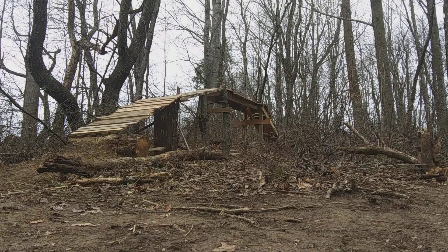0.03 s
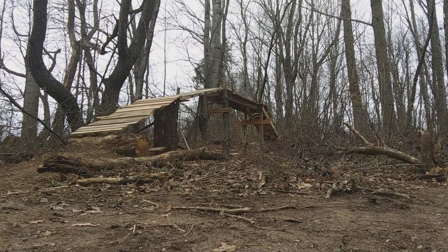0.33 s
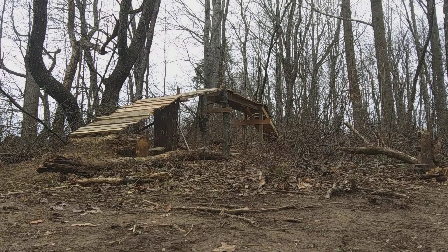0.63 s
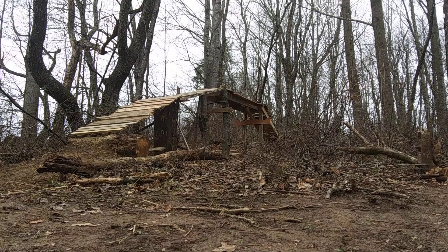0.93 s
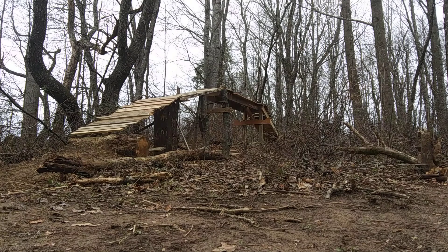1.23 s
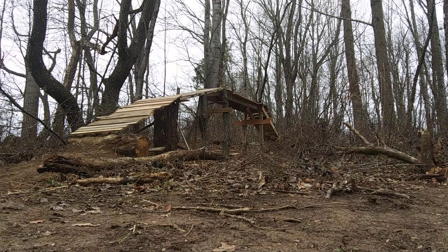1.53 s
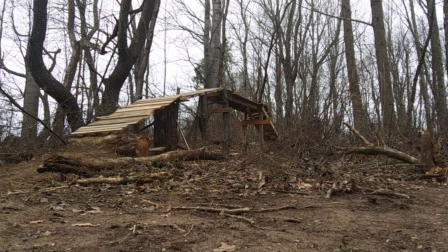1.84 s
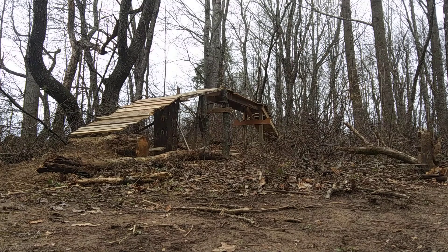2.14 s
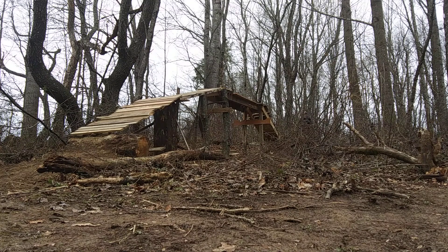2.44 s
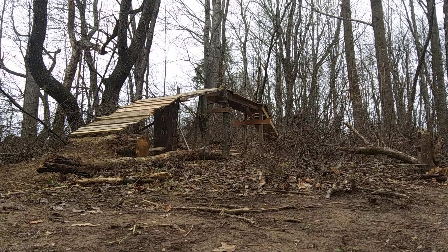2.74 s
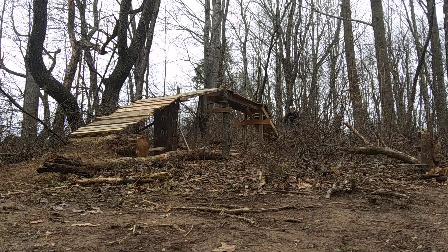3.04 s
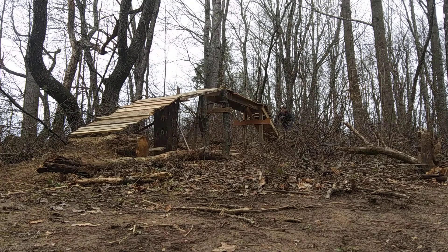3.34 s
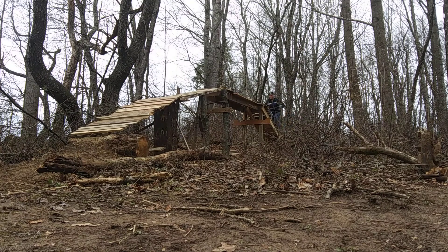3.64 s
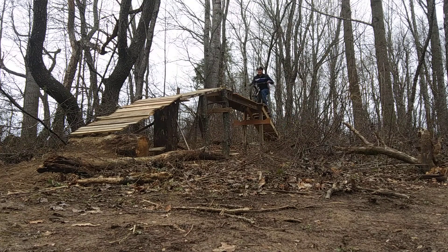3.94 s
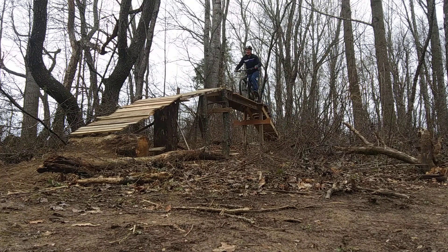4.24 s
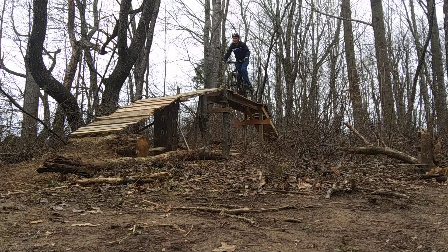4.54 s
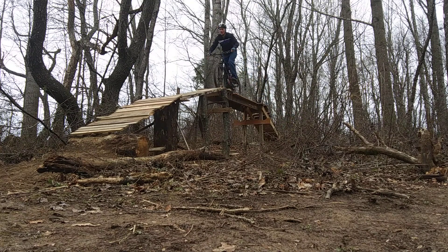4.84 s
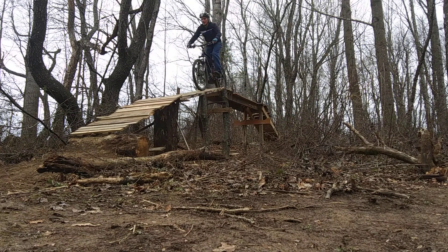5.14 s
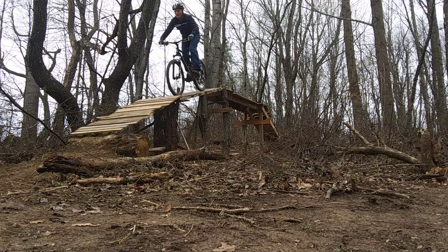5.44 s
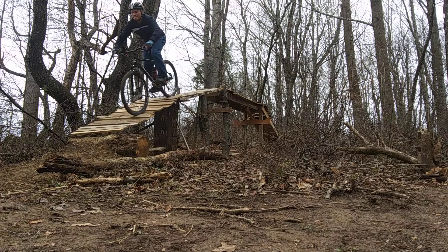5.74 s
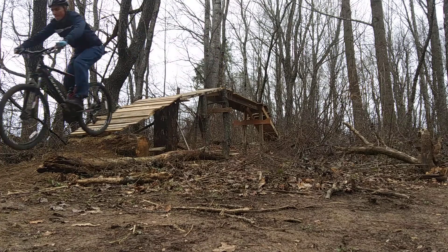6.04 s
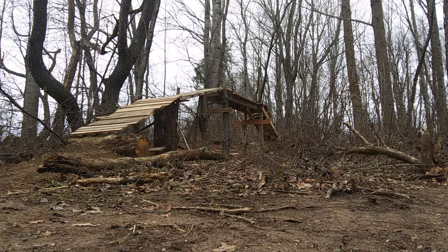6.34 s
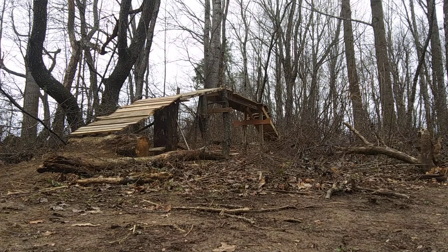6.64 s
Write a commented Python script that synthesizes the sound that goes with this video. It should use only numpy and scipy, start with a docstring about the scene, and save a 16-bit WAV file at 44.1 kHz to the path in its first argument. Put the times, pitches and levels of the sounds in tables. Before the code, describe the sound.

A mountain bike approaches through a still forest where a small bird is barely heard far off. Its tyres bump onto a hollow wooden ramp, the boards snapping and humming lightly beneath them. After a softer stretch of coasting, the wheels slam down on the near slope, loud and close. The chain clatters against the frame as the bike passes the microphone and runs out over gritty ground and dry leaves.

```python
"""A quiet, leafless wood with a far-off bird. A mountain bike crosses a wooden ramp and passes close by.
Its wheels knock onto the far slope and rumble over the slats, setting the planks ringing; after a short
hop it slams onto the near slope. The chain slaps the frame, then rattles lightly as the tyres crunch
out over dirt and dry leaves. The trunks scatter a faint tail."""
import sys
import numpy as np
from scipy import signal
from scipy.fft import rfft, irfft
from scipy.io import wavfile
from scipy.ndimage import uniform_filter1d

SR = 44100
rng = np.random.default_rng(int(sys.argv[2]) if len(sys.argv) > 2 else 0)


def waveform_to_disk(signal):
    """Save audio, clipped to [-1, 1], as 16-bit WAV at the path in sys.argv[1]."""
    frames = np.transpose(np.atleast_2d(signal))
    scaled = np.clip(frames, -1, 1) * 32767
    samples = np.round(scaled).astype(np.int16)
    wavfile.write(sys.argv[1], SR, samples)


N = 295029
T = np.arange(N) / SR
CUTOFF_HZ = 16000


def from_db(db):
    """Decibels to gain."""
    return 10 ** (np.asarray(db) / 20)


def rms_one(x):
    """Scale to rms 1."""
    return x / np.sqrt(np.mean(x ** 2) + 1e-20)


def at_hz(points, hz):
    """Read a curve along log frequency."""
    f, value = np.transpose(points)
    return np.interp(np.log(np.maximum(hz, 1)), np.log(f), value)


def eq(x, curve, size=4096):
    """Minimum-phase EQ: nothing rings ahead of an attack."""
    gain = from_db(at_hz(curve, np.fft.rfftfreq(size, 1 / SR)))
    cepstrum = irfft(np.log(gain))
    cepstrum[1:size // 2] *= 2
    cepstrum[size // 2 + 1:] = 0
    impulse = irfft(np.exp(rfft(cepstrum)))[:size // 2]
    return signal.fftconvolve(x, impulse)[:len(x)]


def butter(x, hz, kind):
    """A gentle low-, high- or band-pass."""
    return signal.sosfilt(signal.butter(2, hz, kind, fs=SR, output="sos"), x)


def resonate(x, hz, width_hz):
    """One resonance, unity gain at its peak."""
    r = np.exp(-np.pi * width_hz / SR)
    feedback = [1, -2 * r * np.cos(2 * np.pi * hz / SR), r * r]
    return signal.lfilter(np.array([1, 0, -1]) * (1 - r * r) / 2, feedback, x + 1e-18)


def drift(per_s):
    """A smooth, bounded random modulator; rms 1."""
    knots = rng.standard_normal(4096)
    wander = np.interp(T * per_s, np.arange(len(knots)), knots)
    return rms_one(np.clip(rms_one(wander), -2, 2))


def grains(per_s, spread_db):
    """Random clicks of uneven size; rms 1."""
    sizes = from_db(spread_db * np.minimum(rng.exponential(1, N), 4))
    return rms_one(sizes * rng.choice([-1, 1], N) * (rng.random(N) < per_s / SR))


def burst(t60, rise_s, smooth_bins=201, snap_db=0.0, snap_s=0.00074, size=16384):
    """A contact: a snap, then a dying flurry of micro-impacts, flattened to drive all bands alike."""
    t = np.arange(size) / SR
    attack = 1 - np.exp(-t / rise_s)
    decay = from_db(-60 * t / t60) + from_db(snap_db) * np.exp(-t / snap_s)
    spectrum = rfft(rng.standard_normal(size) * attack * decay)
    power = uniform_filter1d(abs(spectrum) ** 2, smooth_bins)
    return irfft(spectrum / np.sqrt(power + 1e-12))[:size // 2]


def ping(x, hz, width_hz=170, spread=0.506, count=7):
    """A small part rung by x: one mode at hz, inharmonic ones scattered around it; rms 1."""
    steps = np.linspace(-1, 1, count) + rng.uniform(-0.93, 1, count) / count
    partials = np.minimum(hz * np.exp(spread * steps), CUTOFF_HZ)
    others = sum(rng.choice([-1, 1]) * rms_one(resonate(x, f, width_hz)) for f in partials)
    return rms_one(rms_one(resonate(x, hz, width_hz)) + others)


def add(out, s, db, sound):
    """Spot a sound at time s, its loudest 4 ms at an rms level of db."""
    start = round(s * SR)
    loudest = np.sqrt(uniform_filter1d(sound ** 2, 176).max())
    out[start:start + len(sound)] += (from_db(db) / loudest * sound)[:N - start]


# Tone of the ambience bed: f/Hz, level/dB
AIR_EQ = [(24, -47), (40, -13), (77, -32), (96, -21), (296, -6), (500, -1), (1010, -1.16), (1470, -7),
          (3700, -12), (15800, -20.5)]

def air(level_db=-67):
    """The steady, distant hush of the wood."""
    return from_db(level_db) * rms_one(eq(rng.standard_normal(N), AIR_EQ))


# Reverb time of the wood: f/Hz, t60/s
WOOD_DECAY = [(200, 0.66), (1500, 0.83), (6000, 0.53), (14000, 0.11)]

def trunks(x, wet_db=-9.0, build_s=0.00043, bands=8):
    """Diffuse scatter from ramp and trees; the treble dies first."""
    t = T[:SR]
    edges, tail = np.geomspace(100, 16000, bands + 1), 0
    for low, high in zip(edges, edges[1:]):
        band = butter(rng.standard_normal(SR), [low, high], "band")
        t60 = at_hz(WOOD_DECAY, np.sqrt(low * high))
        tail = tail + band * from_db(-60 * t / t60)
    tail *= 1 - np.exp(-t / build_s)
    return from_db(wet_db) * signal.fftconvolve(x, tail / np.linalg.norm(tail))[:N]


# The bike's approach: t/s, distance/m
BIKE_PATH = [(3.5, 4), (5.77, 1.32), (6.25, 0.86), (6.69, 1)]

def reverb_send():
    """The sound dries up as the bike comes nearer, down to one metre."""
    metres = np.maximum(np.interp(T, *np.transpose(BIKE_PATH)), 1)
    return np.sqrt(metres / metres[0])


# Bird notes: t/s, length/s, f/Hz, level/dB
BIRD_NOTES = [(0.412, 0.11, 5050, -81), (1.777, 0.022, 5740, -72), (1.97, 0.025, 6250, -75)]

def bird(fall=0.043, waver=0.02):
    """A small bird far off: thin, wavering notes that slide down a little."""
    out = np.zeros(N)
    for s, length, hz, db in BIRD_NOTES:
        progress = np.linspace(0, 1, int(length * SR))
        bend = fall * (0.5 - progress) + waver * drift(per_s=300)[:len(progress)]
        phase = 2 * np.pi * np.cumsum(hz * (1 + bend)) / SR
        add(out, s, db, np.sin(phase) * np.sin(np.pi * progress))
    return out


# Bright tone shared by trail ticks and chain: f/Hz, level/dB
CLICK_EQ = [(150, -51), (700, 3), (2000, -4), (6800, -1), (9300, -7), (12000, -9), (16000, -16)]

def click_tone(x, hz, fall_db):
    """Voice a hard click: a hump at hz, falling fall_db per octave to either side."""
    octaves = np.arange(-5, 4)
    hump = np.transpose([hz * 2.0 ** octaves, -fall_db * abs(octaves)])
    return eq(eq(x, hump), CLICK_EQ)


# Small ticks as the bike approaches: t/s, level/dB before trim
TRAIL_TICKS = [(1.231, -54), (2.3035, -58), (2.3565, -51.5), (2.803, -60), (2.975, -56), (3.3523, -55),
               (3.4032, -56), (4.13, -54), (4.33, -55), (5.126, -50.5), (5.584, -48)]

def trail_ticks(trim_db=-5.5):
    """Thin, faint snaps: a few far off before the bike arrives, more as it crosses the ramp."""
    out = np.zeros(N)
    for s, db in TRAIL_TICKS:
        snap = burst(t60=0.012, rise_s=0.0004)
        add(out, s, db + trim_db, click_tone(snap, hz=5830, fall_db=16.0))
    return out


# Crisp tone shared by grit and drivetrain: f/Hz, level/dB
CRISP_EQ = [(500, -25), (1800, -4), (3200, -6), (5700, 10), (8000, -7), (11000, -7), (16000, -24)]

def crisp(x):
    """Thin clicks down to a dry, papery top end; rms 1."""
    return rms_one(eq(x, CRISP_EQ))


# Light ticking while coasting: t/s, rate/Hz, level/dB before trim
COAST_TICKS = [(4.25, 27, -59), (4.599, 23, -63), (5.02, 40, -72), (5.75, 39, -59)]

def drivetrain(trim_db=-5.5, uneven_db=3.0):
    """The coasting drivetrain ticks in step with the wheel's speed."""
    s, per_s, db = np.transpose(COAST_TICKS)
    tick_count = np.cumsum(np.interp(T, s, per_s, left=0, right=0)) / SR
    out = np.zeros(N)
    for at in T[1:][np.diff(np.floor(tick_count)) > 0]:
        snap = crisp(burst(t60=0.025, rise_s=0.00051))
        tick = snap + ping(snap, hz=4230)
        tick_db = np.interp(at, s, db) + uneven_db * rng.standard_normal()
        add(out, at, tick_db + trim_db, tick)
    return out


# Hum of the tread on the boards: t/s, f/Hz, level/dB before flutter, octave/dB re fundamental
TREAD_HUM = [(3.53, 420, -73, -11), (3.59, 490, -59.5, -2), (3.66, 500, -64, 8), (3.73, 590, -66.5, -5),
             (3.81, 430, -66, -16), (3.95, 353, -64.5, -7), (4.049, 250, -76, -2), (4.5, 266, -80, 4),
             (5.099, 290, -68, 1), (5.698, 280, -70, 8)]

def tread_hum(flutter_db=4.5, climb_waver_hz=21, deck_waver_hz=50, deck_start_s=4.05):
    """Knobs meet the boards in a nearly regular stream, which blurs to a rumble on the uneven deck."""
    s, hz, db, octave_db = np.transpose(TREAD_HUM)
    waver_hz = np.where(T < deck_start_s, climb_waver_hz, deck_waver_hz)
    knob_hz = np.interp(T, s, hz) + waver_hz * drift(per_s=150)
    phase = 2 * np.pi * np.cumsum(knob_hz) / SR
    octave = from_db(np.interp(T, s, octave_db))
    tone = rms_one((np.sin(phase) + octave * np.sin(2 * phase)) / np.hypot(1, octave))
    fader_db = np.interp(T, s, db, left=-120, right=-120)
    return tone * from_db(fader_db + flutter_db * (drift(per_s=60) - 0.5))


# Resonances of the ramp's planks: f/Hz, width/Hz, level/dB relative to ring_db
PLANK_RING = [(344, 59, -6), (450, 140, -4), (562, 37, -2.5), (760, 56, -8.5), (1010, 76, 3.5),
              (1154, 34, -10.5), (1495, 37, 1.5), (1650, 56, 2), (1830, 38, -1), (2130, 110, 5),
              (2580, 45, 4), (2980, 430, 4)]

def planks(x, ring_db):
    """The contact itself plus the woody ring it sets off."""
    return x + sum(from_db(ring_db + db) * resonate(x, hz, width) for hz, width, db in PLANK_RING)


def clinks(level_db=-9.0, per_s=12, low_hz=2700, high_hz=9500, count=12):
    """Loose parts and leaves click at random, each at its own pitch; each of the count pitches clicks about
    per_s times a second."""
    out = np.zeros(N)
    for hz in np.geomspace(low_hz, high_hz, count):
        hits = signal.fftconvolve(grains(per_s, spread_db=3.5), burst(t60=0.05, rise_s=0.00036))
        out += resonate(hits[:N], hz, width_hz=0.053 * hz)
    return from_db(level_db) * rms_one(out)


# Ground under the tyres, in order: trail, far slope, deck, crest, near slope, foot of the ramp, dirt and
# leaves. t/s, length/s, starting rumble/dB, starting crunch/dB, swell/(dB/s)
GROUND = [(2.6, 0.94, -92, -79.5, 8), (3.532, 0.69, -65.5, -65, -5), (4.272, 1.385, -74, -81.5, 7.5),
          (5.709, 0.06, -56, -58, -5), (5.763, 0.32, -43, -44, -3), (6.179, 0.13, -42, -39, -5),
          (6.3, 0.57, -49.5, -48.5, -3)]

def tyre_load(attack_s=0.01, release_db_per_s=175):
    """Envelopes of rumble and crunch: on each stretch the tyres bite, swell or fade, then let go."""
    rumble, crunch = 0, 0
    for s, length, rumble_db, crunch_db, swell_db_per_s in GROUND:
        held = np.clip(T - s, 0, length)
        after = np.maximum(T - s - length, 0)
        shape = np.minimum(held / attack_s, 1) * from_db(swell_db_per_s * held - release_db_per_s * after)
        rumble = np.maximum(rumble, from_db(rumble_db) * shape)
        crunch = np.maximum(crunch, from_db(crunch_db) * shape)
    return rumble, crunch


# Tone of the tyre rumble: f/Hz, level/dB
TYRE_EQ = [(30, -45), (90, -35), (175, -15.5), (305, 0), (500, -1), (1100, -3), (2000, -8.5), (4000, -11.5),
           (12000, -23.5)]

def rolling(grit_db=-9.5, bump_db=3.0, rattle_db=8.0, ramp_end_s=6.33, dirt_low_cut_hz=340):
    """Tread knobs drum, hollow on wood and thin on dirt; grit and leaves crackle with each bump."""
    rumble, crunch = tyre_load()
    bumps = drift(per_s=110)
    knobs = rms_one(eq(grains(per_s=3000, spread_db=2.5), TYRE_EQ))
    on_wood = rms_one(planks(knobs, ring_db=-8.0))
    on_dirt = rms_one(butter(knobs, dirt_low_cut_hz, "high"))
    tread = np.where(T < ramp_end_s, on_wood, on_dirt) * from_db(bump_db * bumps)
    grit = crisp(grains(per_s=650, spread_db=3.5))
    rattle = (bumps + drift(per_s=300)) / 2
    grit *= from_db(grit_db + rattle_db * rattle)
    return rumble * tread + crunch * (grit + clinks())


# Each wheel's weight landing on the ramp's frame: t/s, level/dB
RAMP_THUMPS = [(3.548, -54), (3.736, -53.5)]
# Their hollow low end: f/Hz, level/dB
THUMP_EQ = [(35, -30), (90, -25), (150, -9), (220, 1.5), (450, 3), (900, -32), (3000, -51)]

def ramp_thumps():
    """The hollow ramp booms as the front and then the rear wheel mount it."""
    out = np.zeros(N)
    for s, db in RAMP_THUMPS:
        add(out, s, db, eq(burst(t60=0.19, rise_s=0.0013), THUMP_EQ))
    return out


# Loose boards snapping under the weight: t/s, level/dB before trim
BOARD_SNAPS = [(3.5798, -50), (3.749, -45.5), (3.825, -53), (3.9942, -51), (4.004, -46), (4.028, -52),
               (4.189, -51), (4.222, -54), (4.2337, -53.5)]
# Their hard upper mids: f/Hz, level/dB
SNAP_EQ = [(200, -17), (700, -13), (1900, 1), (4800, -1.5), (7000, -15), (14000, -38)]

def board_snaps(trim_db=-1.5):
    """A board snaps against its support: one spike, a short flurry and the ring of the planks."""
    out = np.zeros(N)
    for s, db in BOARD_SNAPS:
        flurry = burst(t60=0.052, rise_s=0.00032)
        force = signal.unit_impulse(len(flurry)) + flurry / np.linalg.norm(flurry)
        add(out, s, db + trim_db, planks(eq(force, SNAP_EQ), ring_db=-13.0))
    return out


# Light metallic clinks of the chain on the run-out: t/s, level/dB, f/Hz, t60/s
CHAIN_RATTLE = [(6.144, -39.5, 6400, 0.024), (6.395, -33.5, 9100, 0.024), (6.407, -38.5, 6700, 0.047),
                (6.4356, -35.5, 6400, 0.054), (6.481, -30.5, 5750, 0.024), (6.5048, -31, 6100, 0.033),
                (6.511, -30, 5700, 0.024), (6.536, -34.5, 5100, 0.065), (6.555, -37, 5260, 0.031),
                (6.572, -39, 6030, .025), (6.615, -38.5, 8000, .028), (6.648, -35.5, 5700, 0.047),
                (6.659, -36, 5950, .04)]

def chain_rattle(ring_db=-10.0):
    """The chain rattles as the bike rolls out, each clink with a brief ring of its own."""
    out = np.zeros(N)
    for s, db, hz, t60 in CHAIN_RATTLE:
        clink = burst(t60, rise_s=0.00025)
        clink = rms_one(clink) + from_db(ring_db) * ping(clink, hz)
        add(out, s, db, click_tone(clink, hz, fall_db=9.0))
    return out


# Metal hits on the frame: chain slaps, a ringing frame part and the frame bottoming out: t/s, level/dB, f/Hz,
# roll-off/(dB/octave), t60/s
FRAME_HITS = [(3.552, -52, 2440, 9, .03), (3.755, -48, 5870, 13, 0.055), (3.887, -49.5, 4263, 0, 0.16),
              (3.973, -59, 5860, 25, 0.1), (4.201, -59, 4900, 0, 0.082), (5.354, -46.5, 3050, 5, 0.022),
              (5.49, -53, 6500, 4, 0.037), (5.7692, -20, 6520, 33, 0.026), (5.7691, -21.5, 2430, 7, 0.086),
              (5.8088, -29, 2800, 14, 0.013), (5.818, -24.5, 3910, 15, 0.017),
              (5.829, -34.5, 3600, 11, 0.021), (5.868, -36.5, 5250, 26, 0.017),
              (5.898, -38.5, 5520, 15, 0.026), (5.9264, -28.5, 5670, 5.5, 0.062),
              (5.967, -33.5, 5370, 14, 0.021), (5.984, -37.5, 8300, 19, 0.032),
              (6.019, -36, 6600, 0, 0.028), (6.0276, -26.5, 5270, 14, 0.014),
              (6.0361, -23, 4520, 13, 0.012), (6.061, -38.5, 6300, 12, 0.034),
              (6.085, -32.5, 7700, 2, 0.062), (6.192, -31, 5430, 4.5, 0.051),
              (6.2008, -23.5, 6000, 13, 0.022), (6.206, -24.5, 5430, 8, 0.025),
              (6.2104, -27.5, 5300, 1.5, 0.049), (6.2258, -26.5, 5200, 8, 0.037),
              (6.2348, -27.5, 5700, 12, 0.022), (6.245, -27, 3970, 23, 0.047),
              (6.256, -33.5, 5470, 4, .03), (6.293, -16, 7400, 6.5, 0.032)]

def frame_hits(ring_db=-6.5):
    """Metal strikes the frame, mostly chain links slapping it: a sharp transient and a brief metallic ring."""
    out = np.zeros(N)
    for s, db, hz, fall_db, t60 in FRAME_HITS:
        slap = burst(t60, rise_s=0.00016, snap_db=-1.0)
        slap = rms_one(slap) + from_db(ring_db) * ping(slap, hz)
        add(out, s, db, click_tone(slap, hz, fall_db))
    return out


# Wheels striking planks and ground: t/s, level/dB before trim, f/Hz, t60/s
WHEEL_KNOCKS = [(3.547, -43, 770, 0.043), (3.581, -44, 1880, 0.055), (3.631, -40.5, 1150, 0.045),
                (3.672, -47.5, 1680, 0.045), (3.729, -46, 920, .05), (3.739, -46, 520, 0.064),
                (3.753, -43, 520, 0.032), (5.562, -41, 800, 0.11), (5.712, -42.5, 1010, 0.12),
                (5.7697, -10, 2100, 0.015), (5.7766, -10, 1370, 0.038), (5.784, -18.5, 930, 0.041),
                (5.8173, -17.5, 1500, 0.02), (5.941, -25, 1160, 0.051), (5.9538, -23.5, 1530, 0.016),
                (6.034, -24.5, 960, 0.03), (6.183, -41, 705, 0.04), (6.205, -29, 950, 0.046),
                (6.244, -28.5, 750, 0.058), (6.2925, -20.5, 600, 0.02)]
# Their mid-heavy body: f/Hz, level/dB
KNOCK_EQ = [(50, -58), (150, -25), (300, -5), (600, 5), (2500, -5), (4000, -13), (12000, -45)]

def wheel_knocks(trim_db=-10.5):
    """Tyres strike and set the planks ringing; the lower a blow's pitch, the duller its top end."""
    out = np.zeros(N)
    for s, db, hz, t60 in WHEEL_KNOCKS:
        blow = burst(t60, rise_s=0.00068, smooth_bins=21)
        blow = resonate(blow, hz, width_hz=1.57 * hz)
        blow = butter(blow, 2.5 * hz, "low")
        add(out, s, db + trim_db, planks(eq(blow, KNOCK_EQ), ring_db=-2.0))
    return out


def scene():
    """The mono mix: bike, bird and their reverb over the ambience bed."""
    impacts = ramp_thumps() + wheel_knocks() + board_snaps() + frame_hits() + chain_rattle()
    sources = impacts + rolling() + tread_hum() + drivetrain() + trail_ticks() + bird()
    return (sources + trunks(sources * reverb_send()) + air())[None]


def record(dry, start_s=0.073, fade_s=0.013):
    """A moment of silence, a quick fade-in and a steep high cut."""
    fade_in = np.clip((T - start_s) / fade_s, 0, 1)
    high_cut = signal.ellip(10, 0.1, 80, CUTOFF_HZ, fs=SR, output="sos")
    return signal.sosfilt(high_cut, dry * fade_in)


dry = scene()
out = record(dry)
waveform_to_disk(out)
```